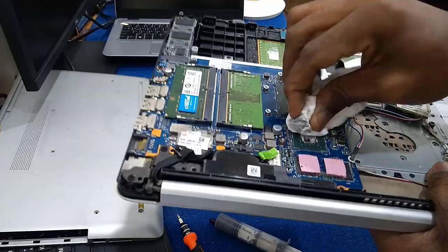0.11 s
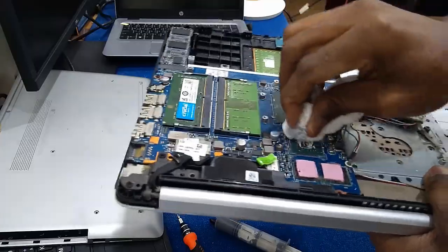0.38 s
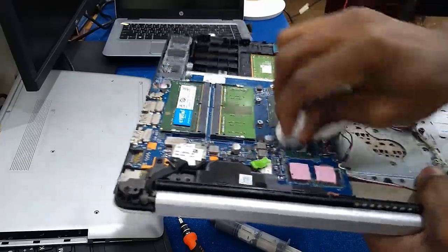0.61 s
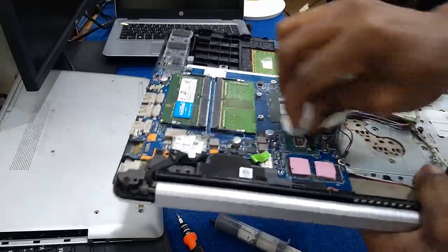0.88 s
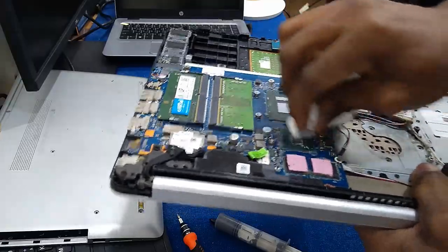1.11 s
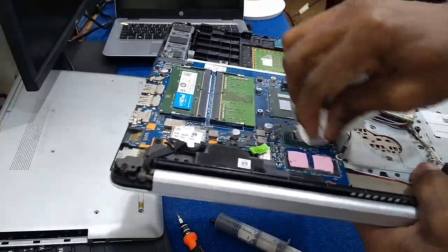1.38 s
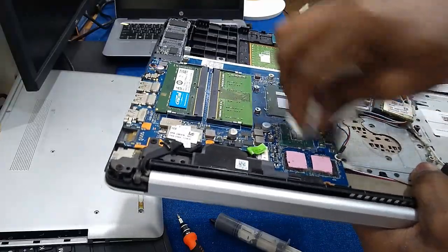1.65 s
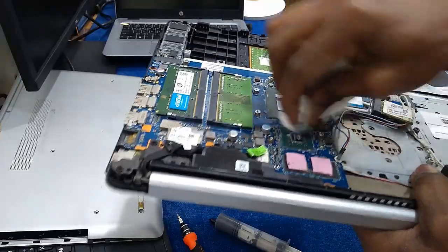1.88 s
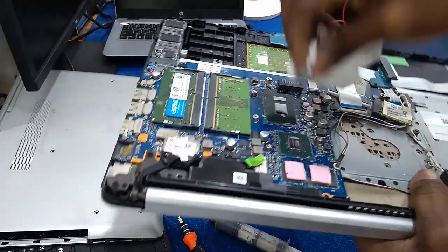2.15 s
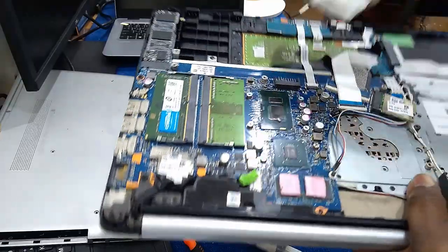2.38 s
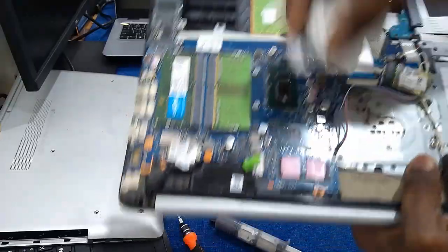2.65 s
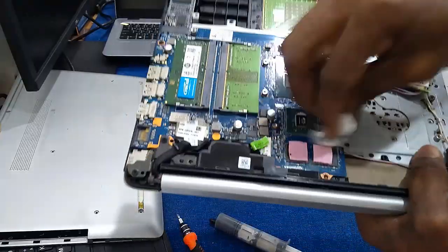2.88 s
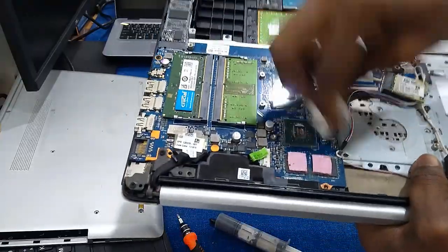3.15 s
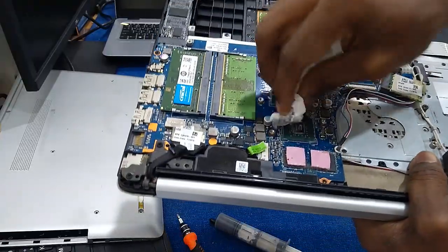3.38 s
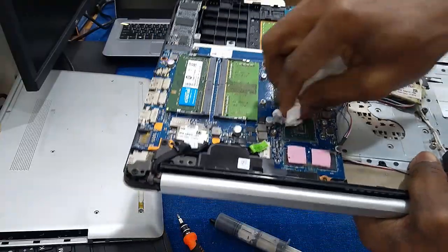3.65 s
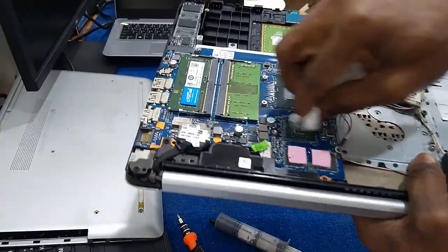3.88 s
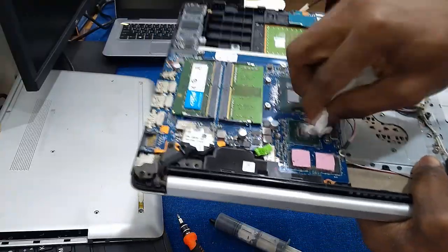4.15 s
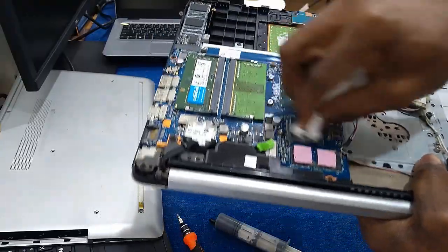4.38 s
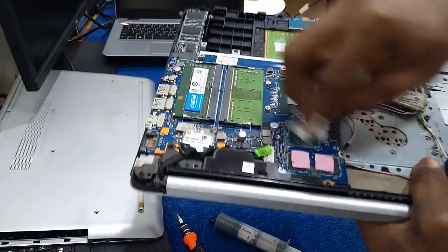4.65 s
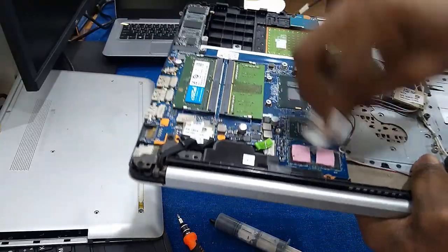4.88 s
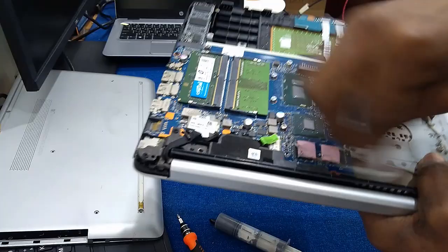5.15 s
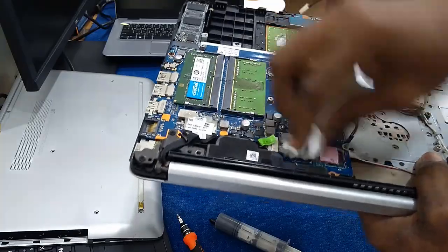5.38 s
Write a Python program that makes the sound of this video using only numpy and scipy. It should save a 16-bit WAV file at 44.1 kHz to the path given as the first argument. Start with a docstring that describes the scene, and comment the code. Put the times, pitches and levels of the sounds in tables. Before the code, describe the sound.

A close, dry stereo sound of a paper tissue scrubbing dried paste off a processor on an open laptop board, in a quiet indoor workshop. Low machine rumble and soft room air continue throughout. From 0 to about 2.1 s the wipes are fast and firm, swelling quickly into one another, bright and papery with dense crackle, small gritty ticks and brief faint squeaky scrapes. From 2.2 to 2.7 s they nearly vanish, leaving light brushes and dull bumps of the hand-held case. Firmer strokes return near 2.95 and 3.2 s, then softer, sparser rubs follow until 4.2 s. A light tick leads to a very loud, sharp nail snap at 4.24 s with a small knock of the case. Wiping resumes, firm around 4.65, 4.85 and 5.2 s, with a last short rub near 5.5 s. The left is brighter, with a ringing high edge, and bassier; case knocks lean right.

```python
"""Close two-port take of a paper tissue scrubbing a processor on an open laptop board in a quiet workshop.
Low rumble and soft room air run throughout, under noise-driven knocks and low bumps of the hand-held case.
For two seconds the wipes come fast and firm, about a dozen a second: fibres catch and let go as dense clicks.
They thin out and soften, return firmly near 3 s, and at 4.24 s a nail snaps on an edge, a loud sharp step;
wiping goes on to the end. The left port rings near 5.7 kHz and hears more rubbing and bass than the right."""
import sys
import numpy as np
from scipy import signal
from scipy.fft import rfft, irfft, next_fast_len
from scipy.io import wavfile
from scipy.ndimage import uniform_filter1d, map_coordinates

SR = 44100
rng = np.random.default_rng(int(sys.argv[2]) if len(sys.argv) > 2 else 0)


def dump(signal):
    """Clip the signal to [-1, 1] and save it as 16-bit WAV at the path in sys.argv[1]."""
    limited = np.clip(np.atleast_2d(signal).T, -1, 1)
    pcm = np.round(limited * 32767).astype(np.int16)
    wavfile.write(sys.argv[1], SR, pcm)


def attenuation_scalar(level_db):
    """Turn a level in dB into a linear amplitude multiplier (20 dB per decade)."""
    decades = np.asarray(level_db, float) / 20
    return 10 ** decades


N = 243520  # samples, about 5.5 s

# All levels in the tables are relative, ahead of the layer gains and the microphone ports.
# room air heard around the ports: pitch_hz, level_db
AIR_TONE = [(100, -9), (200, 13), (300, 10), (600, 8.5), (1000, 2), (1300, -7), (3000, -21.5), (6000, -26),
            (8000, -29.5), (10000, -40), (12000, -41), (13000, -69)]
# low building and machine rumble: pitch_hz, level_db
RUMBLE_TONE = [(25, -16.5), (50, -11), (75, -6.5), (100, -1), (125, -3.5), (154, -3), (190, -20),
               (260, -17), (400, -59.5)]
# low modes of the case: pitch_hz, width_hz (of the sharper of two passes), level_db
CASE_RESONANCES = [(363, 53, 3.5), (414.5, 28.8, 6.5), (235.7, 31, -2.5), (510, 150, -18)]
# the case shudders against its support: peak_s, level_db, length_ms (to fall 7.3 dB; 0 is silent)
CASE_SHUDDERS = [(0.005, -69.5, 17), (0.457, -62.5, 31), (0.79, -66.5, 50), (1.23, -66, 19),
                 (1.369, -60, 37), (1.902, -60.5, 58), (2.19, -66.5, 17), (2.411, -55, 0),
                 (2.729, -63.5, 27), (2.96, -73, 28), (3.159, -64, 9), (3.29, -77, 17), (3.4, -71, 9),
                 (3.49, -59, 35), (3.61, -69.5, 26), (3.808, -60.5, 25), (3.949, -60, 39),
                 (4.246, -48, 7.5), (4.41, -69, 43.5), (4.75, -68.5, 30), (4.972, -59, 4), (5.21, -65, 26),
                 (5.32, -77, 12), (5.51, -73, 21.5)]
# soft bumps of the case in the hand: start_s, level_db, pitch_hz
CASE_BUMPS = [(0.274, -42.5, 124), (0.63, -38, 137), (1.245, -50, 103), (1.724, -35, 105),
              (2.396, -40.5, 111), (2.486, -45.5, 98), (2.774, -48.5, 120), (3.088, -47.5, 103),
              (3.479, -39, 150), (3.669, -47, 138), (3.835, -37.5, 119), (3.965, -49, 123),
              (4.107, -49.5, 107), (4.21, -45.5, 108)]
# pressed board or paste sings at one pitch: start_s, length_s (stretched below), pitch_hz, width_hz, level_db
SINGING_SCRAPES = [(0.665, 0.077, 1810, 200, -52), (0.7, 0.062, 1294, 200, -53),
                   (0.853, 0.038, 2260, 150, -49.5), (0.895, 0.17, 1860, 203, -60),
                   (2.008, 0.069, 1100, 100, -71), (2.929, 0.085, 1790, 393, -61),
                   (2.93, 0.14, 1746, 60, -63), (2.919, 0.07, 226, 81, -53),
                   (3.179, 0.085, 1330, 402, -53.5), (3.2, 0.09, 1640, 150, -60),
                   (3.302, 0.1, 2910, 50, -75), (3.365, 0.067, 2940, 30, -74),
                   (3.448, 0.091, 2960, 30, -70.5), (2.682, 0.15, 4460, 130, -64.5),
                   (2.71, 0.11, 3930, 150, -70), (2.726, 0.06, 3000, 200, -72),
                   (2.833, .07, 5600, 100, -73), (3.669, 0.11, 2360, 200, -63),
                   (3.67, 0.18, 2810, 150, -68.5), (3.88, 0.1, 1717, 40, -78),
                   (3.893, 0.1, 4690, 60, -81.5), (4.957, 0.11, 5630, 900, -62.5),
                   (4.407, 0.034, 2650, 200, -62), (1.528, .035, 2900, 200, -58),
                   (2.133, 0.026, 2780, 400, -57), (4.237, 0.074, 1350, 1020, -54.5)]
# small catches of dried paste under the tissue: release_s, level_db, board_db (relative to level_db)
PASTE_CATCHES = [(0.6007, -24, -30), (0.61, -16, -30), (0.687, -18, -32), (0.724, -22.5, -2),
                 (0.873, -32, 3), (0.9233, -18, -40), (0.9335, -20, -32), (0.963, -33, -35),
                 (1.042, -25, -35), (1.0632, -18, -35), (1.3417, -24, -6.5), (1.3597, -22, -15),
                 (1.4906, -34, -30), (1.5977, -26, -30), (1.62, -28, -18), (1.7208, -21, -30),
                 (1.7224, -23, -25), (1.8139, -30, -33), (1.8962, -23, -30), (1.9164, -19, -40),
                 (1.9307, -23, -18), (1.9655, -39, -30), (2.0402, -20, -45), (2.7453, -31, -35),
                 (2.7565, -29, -28), (2.9592, -26, -28), (3.194, -22, -30), (3.3877, -37, -35),
                 (3.542, -34, -33), (3.6886, -40, -25), (3.988, -42, -35), (4.4166, -28, -30),
                 (4.5361, -27, -39), (4.6078, -21, -40), (4.6473, -16, -21), (4.7589, -28, -33),
                 (4.7723, -35, -33), (4.8275, -23, -38), (4.8401, -18, -38), (5.2465, -31, -28)]
# a catch is narrower than a snap, without its lows and its top: pitch_hz, level_db
CATCH_TONE = [(1000, -60), (1800, -32), (2500, -19), (3800, -1.5), (5000, -2), (5700, 2.5), (6500, -6),
              (8000, -1.5), (11000, -13.5), (15500, -27), (16500, -60)]
# the nail on an edge, a first touch, the snap, a rebound: release_s, level_db, board_db (relative to level_db)
NAIL_SNAPS = [(4.2164, -13.5, -25), (4.2407, 4.5, -25.5), (4.2546, -26.5, -28)]
# a snap is broader than the rubbing: pitch_hz, level_db
SNAP_TONE = [(400, -33), (800, -23.5), (1200, -8), (1800, -17.5), (2400, -20), (3100, -6.5), (3800, -4.5),
             (4500, 0), (5200, -2), (5700, 2), (6200, -10.5), (8000, -3), (12000, -15), (15500, -22.5),
             (16500, -52)]
# wipes of the tissue, rise and fall over which the paper drops 6.5 dB (3 ms at least):
# peak_s, level_db, rise_ms, fall_ms, board_db (relative to level_db)
TISSUE_WIPES = [(0.005, -49, 30.5, 53, -13.5), (0.194, -42.5, 38.5, 30.5, -12.5),
                (0.319, -45.5, 44, 55, -13.5), (0.39, -48.5, 18, 26, -20), (0.471, -39.5, 16.5, 32, -11),
                (0.616, -37, 55, 16, -10), (0.686, -36, 25, 36, -11.5), (0.75, -41.5, 30, 61, -7.5),
                (0.851, -38.5, 7, 20, -20), (0.865, -38, 26, 16.5, -12), (0.929, -37.5, 16, 44, -12.5),
                (1.045, -35, 40, 31.5, -12), (1.125, -41.5, 4, 20, -19), (1.15, -38, 27, 23, -19),
                (1.24, -38, 47, 40, -14.5), (1.356, -39.5, 41, 13.5, -10.5), (1.43, -43.5, 36, 34, -17),
                (1.491, -43, 2, 20, -25), (1.523, -40.5, 20, 37, -17.5), (1.589, -40, 6, 23, -24),
                (1.622, -38, 25, 30, -13), (1.691, -41, 16, 25, -13.5), (1.725, -38.5, 27, 31, -12),
                (1.775, -44, 18, 39, -15.5), (1.815, -37.5, 7, 58, -18), (1.898, -36.5, 6, 24, -20),
                (1.93, -38.5, 32, 73, -10), (2.044, -35, 5.5, 34, -22), (2.112, -42, 5, 44.5, -13.5),
                (2.189, -54.5, 24, 17, -26), (2.37, -69, 19, 25, -28), (2.407, -63.5, 16, 18, -23),
                (2.478, -55, 5, 19, -25), (2.51, -53, 29, 23, -26), (2.58, -69.5, 30, 38, -30),
                (2.684, -53.5, 5, 17, -15), (2.749, -50.5, 43.5, 42, -17), (2.86, -59, 5, 30, -24),
                (2.899, -49, 4, 37, -12), (2.958, -41, 36, 43, -16.5), (3.155, -48.5, 4.5, 20, -26),
                (3.167, -40.5, 5, 16, -25), (3.196, -38, 21, 41, -10.5), (3.37, -57, 0, 18, -20),
                (3.392, -53, 27, 25, -34), (3.478, -55.5, 10, 36, -29), (3.545, -45, 22.5, 62, -17),
                (3.696, -48.5, 17, 26, -18), (3.792, -48.5, 40, 53, -17), (3.93, -67, 40, 43, -35),
                (3.989, -61.5, 6, 24, -35), (4.09, -64, -1, 15, -40), (4.112, -48, 22.5, 32, -52),
                (4.208, -49.5, 8, 41, -40), (4.257, -40.5, 19, 51, -10), (4.33, -43, 33, 35, -15.5),
                (4.418, -46, 1, 4, -19), (4.452, -42.5, 69, 64, -23.5), (4.542, -42.5, 33, 64, -22.5),
                (4.647, -38, 31, 49, -16), (4.747, -40.5, 31, 27.5, -18.5), (4.822, -41, 15.5, 24, -27),
                (4.841, -37.5, 17, 66.5, -13), (4.95, -51.5, 19, 61, -37), (5.03, -62, 39, 18, -37),
                (5.125, -47.5, 8.5, 31, -42), (5.161, -42.5, 7, 24, -41), (5.2, -38, 27, 43.5, -15.5),
                (5.245, -41, 20, 32, -15), (5.489, -50, 7.5, 12, -13.5), (5.515, -44, 13, 29, -17)]
# rubbing at the source, the board's part: pitch_hz, level_db
BOARD_TONE = [(400, -42), (1000, -15.5), (1250, -19), (1500, -14.5), (1900, -1.5), (2400, 2), (3000, 2),
              (3600, -7), (4500, -29), (9000, -67.5)]
# rubbing at the source, the paper's part: pitch_hz, level_db
PAPER_TONE = [(900, -68), (1500, -66.5), (2500, -23.5), (3200, -5.5), (5000, 3), (7000, -3), (9000, -8.5),
              (10500, -14), (14000, -68.5)]
# rubbing at the source, the high sizzle: pitch_hz, level_db
SIZZLE_TONE = [(4000, -54.5), (7000, -36.5), (9000, -6), (10200, -1.5), (11200, -4.5), (12800, -3.5),
               (14000, -7.5), (15400, -13), (15900, -56.5), (17000, -86)]
# left microphone port response: pitch_hz, level_db
LEFT_RESPONSE = [(100, 0.5), (400, 1), (2400, 4.5), (3500, 13), (4800, 11.5), (5250, 14.5), (5480, 17),
                 (5750, 21), (6050, 19.5), (6500, 17.5), (8000, 11), (11000, -1.5), (16000, 8)]
# right microphone port response: pitch_hz, level_db
RIGHT_RESPONSE = [(100, -8.5), (400, -8), (2400, 1), (6000, -2), (11000, -2), (16000, -2.5)]


def unit(x):
    """Scaled to rms 1."""
    return x / np.sqrt(np.mean(x ** 2))


def colour(x, points):
    """Causal filter with the given (Hz, dB) response, built from the cepstrum of its log gain."""
    hz, db = np.transpose(points)
    size = 8192
    grid = np.maximum(np.arange(size // 2 + 1) * SR / size, 1)
    log_gain = np.interp(np.log(grid), np.log(hz), db) * np.log(10) / 20
    ceps = irfft(log_gain)
    # fold onto positive time: minimum phase
    ceps[1:size // 2] *= 2
    ceps[size // 2 + 1:] = 0
    impulse = irfft(np.exp(rfft(ceps)))
    return signal.fftconvolve(x, impulse)[:len(x)]


def ring(x, hz, width):
    """One resonance, gain 1 at its centre."""
    return signal.lfilter(*signal.iirpeak(hz, hz / width, fs=SR), x)


def walk(rate):
    """Random levels held 1 / rate s and slewed twice; spread near 1."""
    hold = int(SR / rate)
    steps = np.repeat(rng.standard_normal(N // hold + 1), hold)
    return 1.53 * uniform_filter1d(uniform_filter1d(steps, hold), hold)[:N]


def grains(per_s, spread_db):
    """Random clicks of rms 1; a wider spread makes a few stand out above many small ones."""
    boost_db = spread_db * np.minimum(rng.exponential(size=N), 3.0)
    size = attenuation_scalar(boost_db) * rng.standard_normal(N)
    return unit(size * (rng.random(N) < per_s / SR))


def flicker(x, depth_db):
    """Narrow bands of the noise swell and fade independently at random."""
    band_hz, hold_s = 330, 0.07  # spacing of the random levels
    hz, t, z = signal.stft(x, SR, nperseg=512)
    chance = rng.standard_normal((80, 200))
    places = np.meshgrid(hz / band_hz, t / hold_s, indexing="ij")
    db = depth_db * map_coordinates(chance, places, order=1, mode="mirror")
    return signal.istft(z * attenuation_scalar(db), SR, nperseg=512)[1][:N]


def nearby(x, t60, db, echo_s, echo_db):
    """Direct sound, decaying scatter off board and hand, and the bench's later echo."""
    t = np.arange(2048) / SR
    tail = rng.standard_normal(len(t)) * attenuation_scalar(-60 * t / t60)
    tail = attenuation_scalar(db) * tail / np.sqrt(np.sum(tail ** 2))
    echo_fade = (t > echo_s) * attenuation_scalar(-60 * (t - echo_s) / 0.062)
    echo = rng.standard_normal(len(t)) * echo_fade / np.sqrt(SR * 0.001)
    tail += attenuation_scalar(echo_db) * echo
    tail[0] = 1  # direct sound
    return signal.fftconvolve(x, tail)[:N]


def air():
    """Diffuse room noise with a slight waver, drawn afresh for each port."""
    waver = attenuation_scalar(1.0 * walk(9))
    return attenuation_scalar(-68) * waver * unit(colour(rng.standard_normal(N), AIR_TONE))


def rumble():
    """Low building and machine noise wavers quickly around two narrow machine hums."""
    drone = rng.standard_normal(N)
    hums = attenuation_scalar(-7.0) * unit(ring(drone, 153.6, 7.9)) + attenuation_scalar(-9.0) * unit(ring(drone, 100, 8.2))
    waver = attenuation_scalar(2.6 * walk(21.87))
    broad = unit(colour(rng.standard_normal(N), RUMBLE_TONE))
    return attenuation_scalar(-59) * (waver * broad + hums)


def case():
    """Uneven, soft little knocks ring the low modes of the case; each shudder swells and dies away alike."""
    curve, rest_db = 1.29, -84  # exponent of the swell; knocks between shudders
    t = np.arange(N) / SR
    swell = attenuation_scalar(rest_db)
    for s, db, ms in CASE_SHUDDERS:
        swell = swell + attenuation_scalar(db - 7.3 * (1000 * np.abs(t - s) / ms) ** curve)
    knocks = grains(900, spread_db=3.5) * swell
    modes = sum(attenuation_scalar(db) * ring(ring(knocks, hz, 1.96 * width), hz, width)
                for hz, width, db in CASE_RESONANCES)
    return attenuation_scalar(25.5) * modes


def bumps():
    """A soft push of about two cycles that rings on a little."""
    push_cycles, ring_cycles = 0.58, 1.1
    out = np.zeros(N)
    for s, db, hz in CASE_BUMPS:
        i = int(s * SR)
        t = np.arange(min(4000, N - i)) / SR - 1.2 / hz  # zero at the peak
        push = np.exp(-(t * hz / push_cycles) ** 2)
        release = 1 / np.cosh(1.6 * t * hz / ring_cycles)
        shape = np.where(t < 0, push, release)
        out[i:i + len(t)] -= attenuation_scalar(db + 1) * shape * np.cos(2 * np.pi * hz * t)
    return out


def scrapes():
    """Friction noise in one resonance swells and fades with pressure; each port faces it differently."""
    t, out = np.arange(N) / SR, 0
    drag = rng.standard_normal(N) + 1.6 * rng.standard_normal((2, N))  # shared, plus each port's own
    stutter = attenuation_scalar(2.2 * walk(90))
    for s, length, hz, width, db in SINGING_SCRAPES:
        progress = np.clip((t - s) / (1.39 * length), 0, 1)
        press = np.sin(np.pi * progress ** 0.53) ** 1.24 * stutter
        tone = unit(ring(ring(drag, hz, 1.5 * width), hz, width))
        out = out + attenuation_scalar(db) * press * tone
    return out


def clicks(rows, tone):
    """Each click creeps for a millisecond, then lets go: a sharp step, a brief crackle, some board tone."""
    bright, low = np.zeros(N + 128), np.zeros(N + 128)
    creep = int(0.001 * SR)
    t = (np.arange(128) - creep) / SR
    fade = np.where(t < 0, 0.015, 0.06 * np.exp(-t / 0.0012))
    for s, db, board_db in rows:
        burst = rng.standard_normal(128) * fade
        burst[creep] = -1  # the release
        i = int(s * SR) - creep
        bright[i:i + 128] += attenuation_scalar(db) * burst
        low[i:i + 128] += attenuation_scalar(db + board_db) * burst
    return (attenuation_scalar(2.0) * colour(bright, tone) + attenuation_scalar(15.0) * colour(low, BOARD_TONE))[:N]


def ticks():
    """The nail's snaps and the small catches of paste, each a sudden release."""
    return clicks(NAIL_SNAPS, SNAP_TONE) + clicks(PASTE_CATCHES, CATCH_TONE)


def wipe_levels():
    """Gains of paper, board and sizzle: each wipe swells, peaks and eases off, the sizzle most steeply."""
    grip, ease = 1.71, 1.41  # exponents of rise and fall
    # a harder wipe sizzles more: share at the firm level, and its growth per dB of wipe level
    firm_wipe_db, firm_sizzle_db, sizzle_growth = -37, -15, 0.93
    slope_db = np.array([[6.5], [7.0], [8.5]])
    t, power = np.arange(0, N, 32) / SR, 0
    for s, db, rise_ms, fall_ms, board_db in TISSUE_WIPES:
        rising = t < s
        away = 1000 * np.abs(t - s) / np.maximum(np.where(rising, rise_ms, fall_ms), 3)
        drop_db = slope_db * away ** np.where(rising, grip, ease)
        sizzle_db = firm_sizzle_db + sizzle_growth * (db - firm_wipe_db)
        part_db = np.array([[0], [board_db], [sizzle_db]])
        power = power + attenuation_scalar(db - drop_db + part_db) ** 2
    return [np.interp(np.arange(N) / SR, t, np.sqrt(p)) for p in power]


def tissue():
    """Fibres catch on the chip: dense slips plus a sparser, fainter layer of similar clicks, part per port."""
    shared, fold_db = 0.38, 0.9  # power share common to both ports; depth of the folds
    # each port also faces its own part of the wad
    both, left, right = (grains(7000, spread_db=0.76) + attenuation_scalar(-9) * grains(1200, spread_db=0.0)
                         for _ in range(3))
    tremble = attenuation_scalar(1.29 * walk(120) + 0.79 * walk(350) + 1.0 * walk(40))
    paper, board, sizzle = wipe_levels()
    size = next_fast_len(N)
    bins_hz = np.maximum(np.arange(size // 2 + 1) * SR / size, 1)
    sixths = 6 * np.log2(bins_hz / 900)  # sixth-octaves above 900 Hz
    # the wad refolds under the finger, so its sixth-octave resonances come and go,
    # most of all the low ones
    folds = []
    for k in range(26):
        depth = min(1, 3500 / (900 * 2 ** (k / 6))) ** 0.8
        folds.append(attenuation_scalar(fold_db * depth * walk(14)))
    out = []
    for own in (left, right):
        rubbing = tremble * (np.sqrt(shared) * both + np.sqrt(1 - shared) * own)
        tones = rfft(rubbing, size)
        slips = 0
        for k, gain in enumerate(folds):
            band = np.maximum(1 - np.abs(sixths - k), 0)
            slips = slips + gain * irfft(tones * band, size)[:N]
        paper_part = attenuation_scalar(-8.5) * paper * unit(flicker(colour(slips, PAPER_TONE), depth_db=3.5))
        board_part = attenuation_scalar(-3.0) * board * unit(flicker(colour(slips, BOARD_TONE), depth_db=2.5))
        sizzle_part = attenuation_scalar(4.5) * sizzle * unit(flicker(colour(slips, SIZZLE_TONE), depth_db=6.5))
        out.append(paper_part + board_part + sizzle_part)
    return np.array(out)


def scene():
    """Left and right sound at the ports; the case shudder is strongest at the right port."""
    low, shudder, sing = rumble() + bumps(), case(), scrapes()
    snaps, rub = ticks(), tissue()
    t60, snap_scatter_db = 0.016, -10  # scatter decay in s, and its level for snaps and catches
    left = nearby(rub[0], t60, -16.0, 0.0098, -22.5) + sing[0]
    left += nearby(snaps, t60, snap_scatter_db, 0.013, -23.5)
    left += low + air() + attenuation_scalar(-9.5) * shudder
    right = nearby(rub[1], t60, -13.5, 0.01, -9.5) + sing[1]
    right += nearby(snaps, t60, snap_scatter_db, 0.012, -18.0)
    # the right port adds a fainter rumble of its own
    right += low + attenuation_scalar(-17.0) * rumble() + air() + attenuation_scalar(9.0) * shudder
    return np.array([left, right])


def band_limit(x):
    """A steep low-pass at the top of the band."""
    return signal.sosfilt(signal.butter(12, 15850, fs=SR, output="sos"), x)


def record(dry):
    """Each port colours its channel, the deepest bass is cut, the loudest snap clips."""
    ports = np.array([colour(dry[0], LEFT_RESPONSE), colour(dry[1], RIGHT_RESPONSE)])
    bass_cut = signal.butter(2, 50, "highpass", fs=SR, output="sos")
    mix = np.clip(signal.sosfilt(bass_cut, ports), -1, 1)
    return band_limit(mix)


dry = scene()
out = record(dry)
dump(out)
```